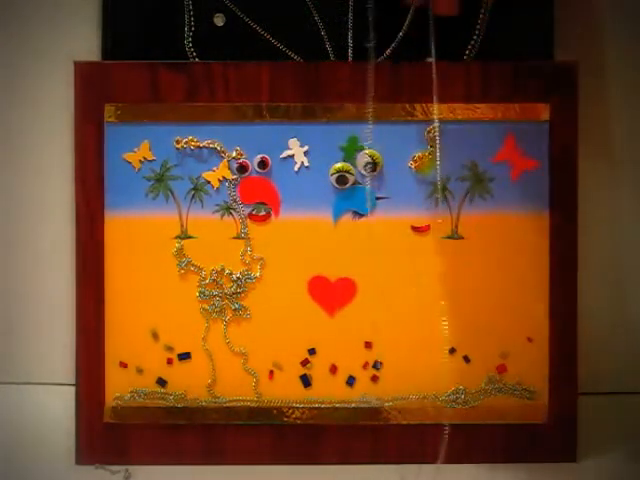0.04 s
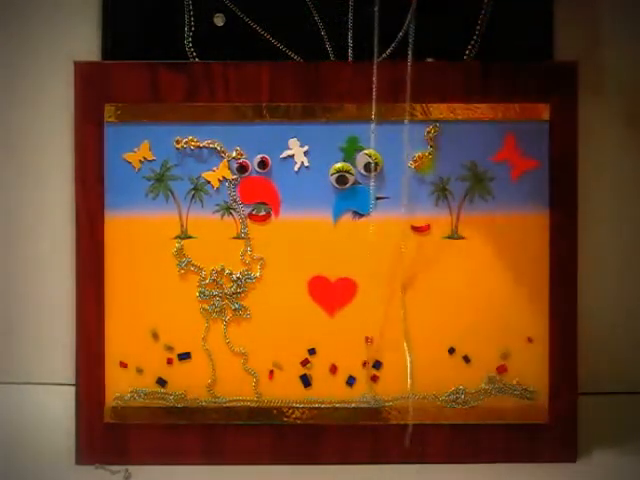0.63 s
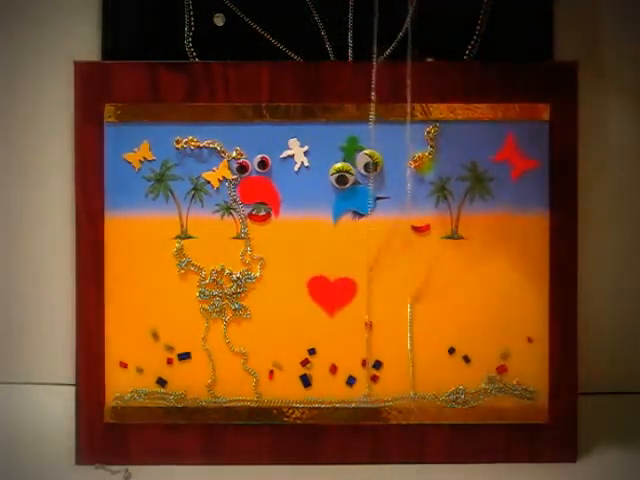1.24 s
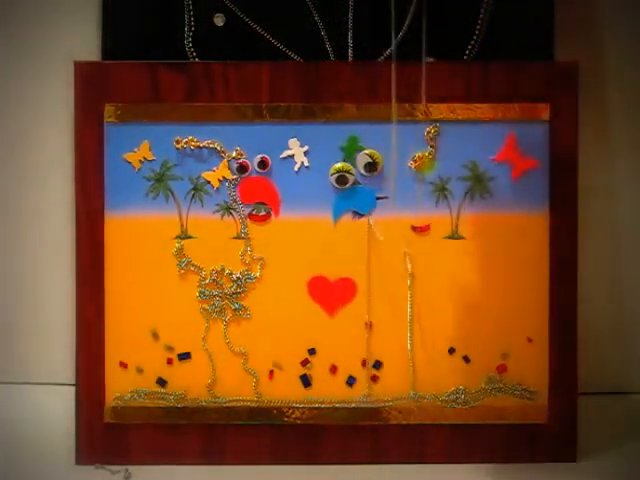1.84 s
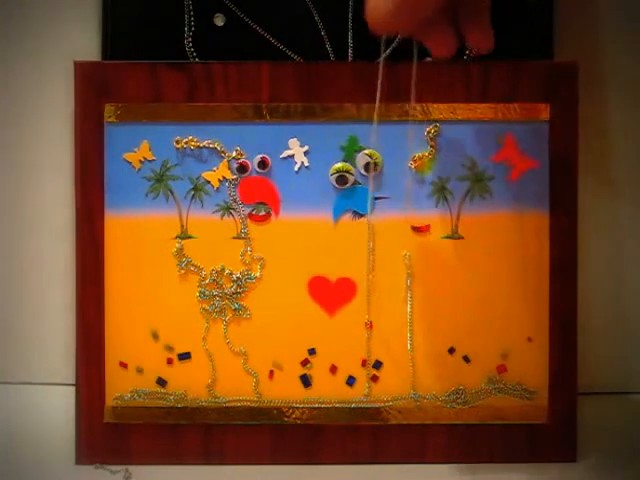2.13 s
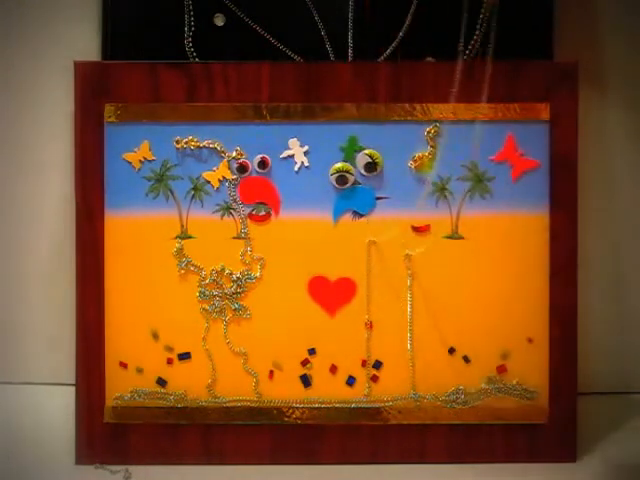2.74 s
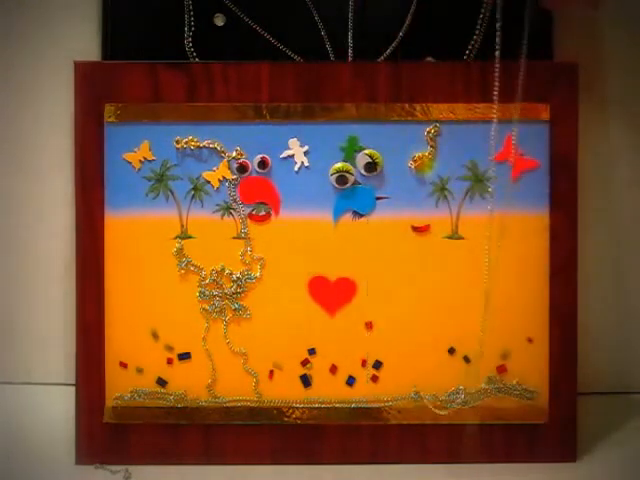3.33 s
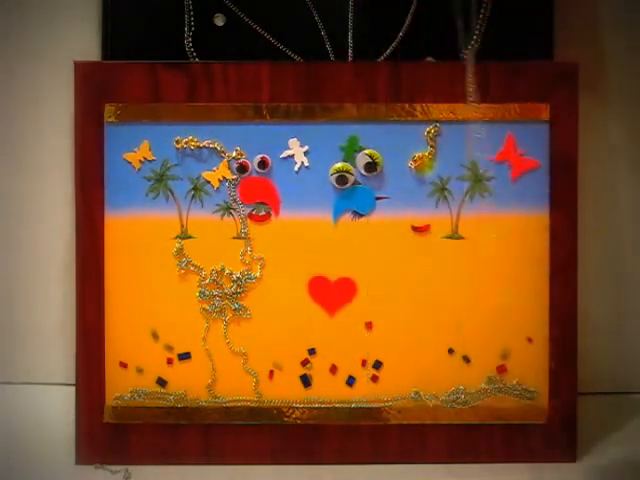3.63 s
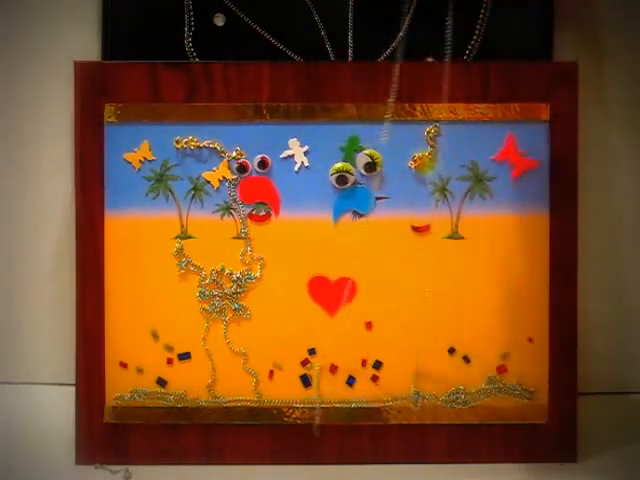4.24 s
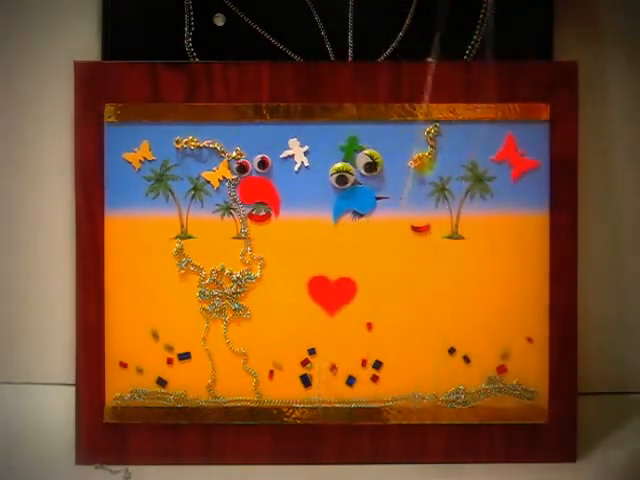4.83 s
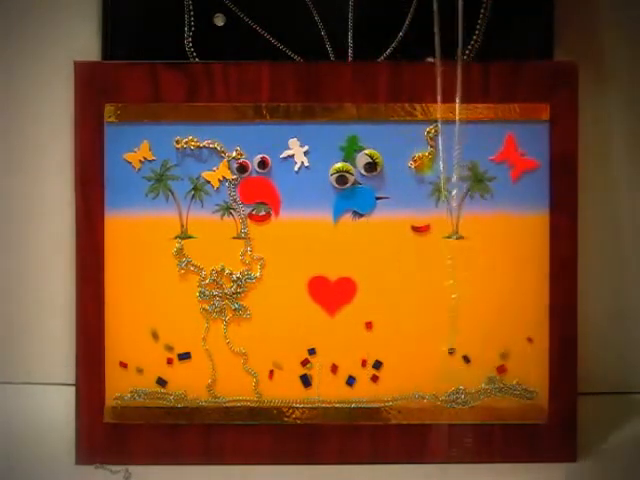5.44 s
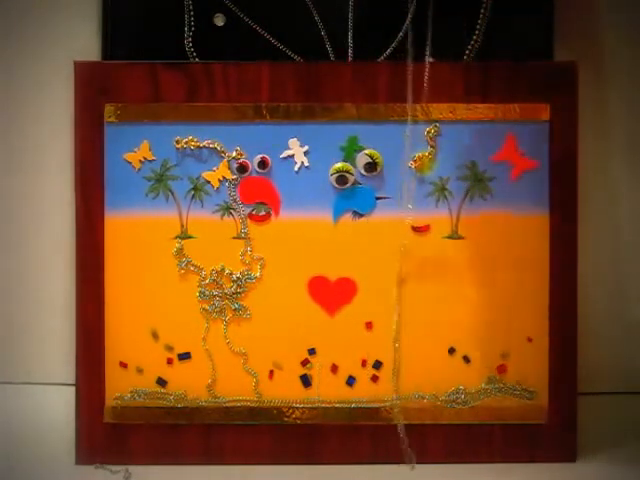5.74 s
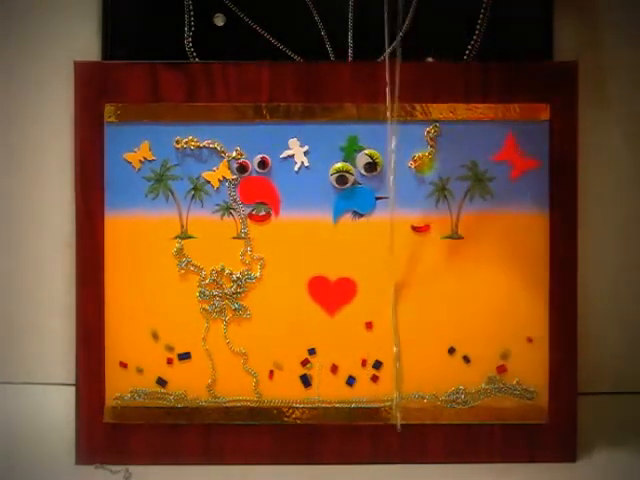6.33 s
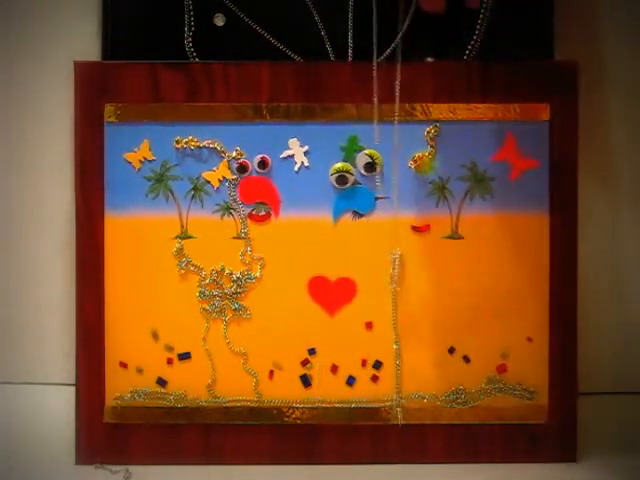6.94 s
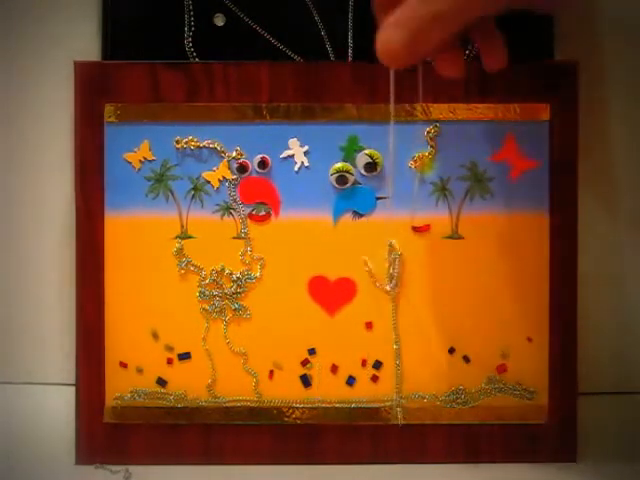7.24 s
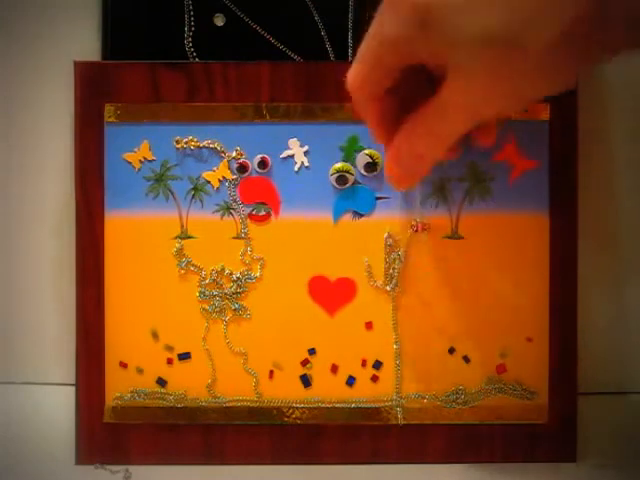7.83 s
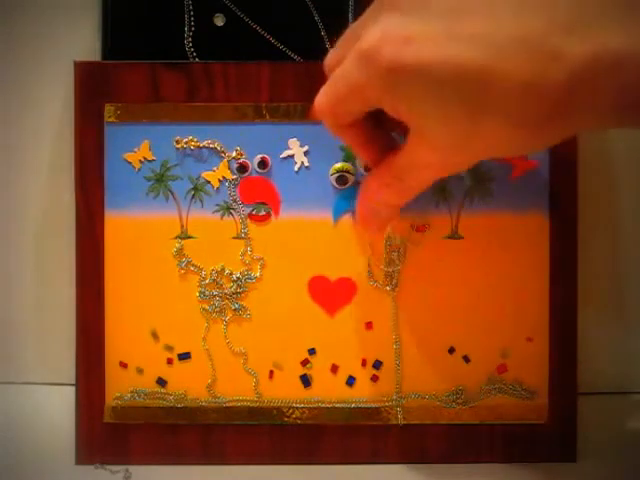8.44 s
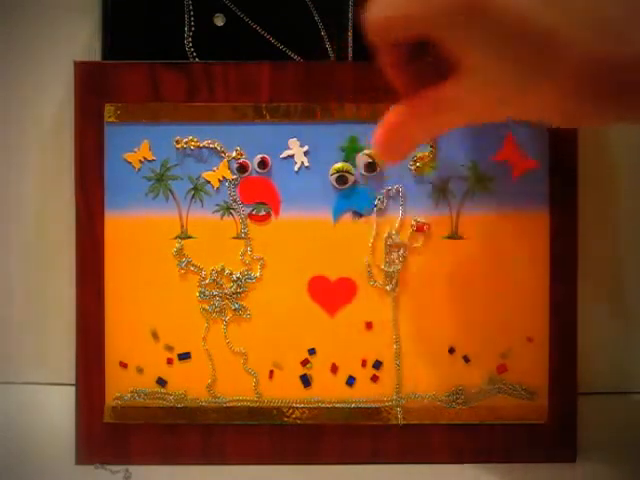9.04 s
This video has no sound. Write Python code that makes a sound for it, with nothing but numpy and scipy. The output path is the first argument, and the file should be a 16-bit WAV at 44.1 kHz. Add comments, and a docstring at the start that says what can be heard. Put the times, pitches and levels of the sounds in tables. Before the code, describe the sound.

Thin metal chains clink, tick and rattle lightly against an upright board in short irregular bursts, over a faint hiss.

```python
"""Thin metal chains dangle against an upright framed board, drag over its edge and are let down onto it.
Their ends knock on the board, sliding links rattle, slack loops clink as they pile up,
links tick over the edge of the frame and a clasp pings.
The booth is small and dead; a mono camera microphone adds hiss and a thin whine."""
import sys
import numpy as np
from scipy import signal
from scipy.fft import rfft, irfft, next_fast_len
from scipy.io import wavfile

SR = 44100
rng = np.random.default_rng(int(sys.argv[2]) if len(sys.argv) > 2 else 0)


def put_to_file(sound):
    """Save the sound as 16-bit audio at rate SR, in the file named by the first command-line argument."""
    columns = np.atleast_2d(sound).T  # one column per channel
    safe = np.clip(columns, -1, 1)
    whole_steps = np.round(safe * 32767)
    wavfile.write(sys.argv[1], SR, whole_steps.astype(np.int16))


N = 405279


def amp(db):
    """Decibels to gain."""
    return 10 ** (np.asarray(db) / 20)


def unit_rms(x):
    """Scale to an rms of one."""
    return x / np.sqrt(np.mean(x ** 2) + 1e-20)


def unit_energy(x):
    """Scale to an energy of one."""
    return x / np.sqrt(np.sum(x ** 2) + 1e-20)


def curve_at(points, hz):
    """Interpolate on a log-frequency axis."""
    points_hz, values = np.transpose(points)
    return np.interp(np.log(hz + 1), np.log(points_hz + 1), values)


def add(mix, start_s, sound):
    """Mix a sound in at start_s."""
    part = mix[round(start_s * SR):][:len(sound)]
    part += sound[:len(part)]


def click(colour, body_db=0, sparkle_db=0, patchy_db=0, dispersion=0.04985, size=1024):
    """Causal pulse of one contact; each link has a slightly different colour."""
    signed_hz = np.fft.fftfreq(size, 1 / SR)
    hz = abs(signed_hz)
    db = curve_at(colour, hz) + body_db * curve_at([(4500, 1), (7500, 0)], hz)
    db += sparkle_db * curve_at([(9000, 0), (12000, 1)], hz)
    db += patchy_db * np.interp(hz, np.linspace(0, SR / 2, 40), rng.standard_normal(40))
    minimum_phase = np.exp(np.conj(signal.hilbert(np.log(amp(db)))))
    # bending waves carry the treble out first: a tiny chirp
    bending = np.exp(-2j * np.pi * dispersion * np.sign(signed_hz) * np.sqrt(hz))
    return np.fft.ifft(bending * minimum_phase).real[:size // 2]


def run_of_links(length_s, gap_s, spread_db, chatter, chatter_s, rise_s):
    """Links land in quick turn and die away, longer clinks swelling first; each chatters as it settles."""
    starts_s = np.arange(0, max(length_s, gap_s / 2), gap_s)
    jitter, weight = rng.standard_normal((len(starts_s), 2)).T
    starts_s[1:] += gap_s * np.clip(jitter[1:] / 4, -.5, .5)
    swell = 1 - np.exp(-(starts_s + gap_s) / rise_s)
    fade = np.exp(-starts_s / max(length_s, gap_s))
    hits = np.zeros(round((starts_s[-1] + gap_s) * SR) + 256)
    np.add.at(hits, np.round(starts_s * SR).astype(int), swell * fade * amp(spread_db * weight))
    settling = signal.lfilter([1], [1, -np.exp(-1 / (chatter_s * SR))], hits)
    return unit_energy(hits) + chatter * unit_energy(settling * rng.standard_normal(len(hits)) ** 3)


def strike(run, pulse, level_db):
    """One pulse per contact; the total energy, spread over 10 ms, has level_db."""
    return amp(level_db) * np.sqrt(SR / 100) * unit_energy(np.convolve(run, pulse))


def ring(modes):
    """Decaying partials of a struck object, at unit energy."""
    t = np.arange(SR // 10) / SR
    partials = (amp(db) * np.sqrt(width_hz) * np.exp(-np.pi * width_hz * t) * np.cos(2 * np.pi * hz * t)
                for hz, width_hz, db in modes)
    return unit_energy(sum(partials))


# hiss spectrum: freq_hz, density_db
HISS_SPECTRUM = [(15, -16), (45, -5.5), (70, -6), (120, -4.5), (400, -2), (800, -3.5), (1500, -6.5),
                 (3700, -9.5), (6500, -11), (9000, -14.5), (11200, -11), (13200, -19.5), (14300, -6.5),
                 (15800, -16)]
# whine lines: pitch_hz, width_hz, rms_db
WHINE_LINES = [(6270, 120, -72), (7560, 2, -60), (7590, 8, -69), (7570, 200, -71), (7865, 60, -71),
               (15121, 8, -69), (15150, 4, -65.5)]


def hiss_and_whine(hiss_rms_db=-48.23):
    """Room air and microphone hiss, with narrow wavering lines of whine."""
    size = next_fast_len(N)
    hiss_gain = amp(curve_at(HISS_SPECTRUM, np.fft.rfftfreq(size, 1 / SR)))
    hiss = irfft(rfft(rng.standard_normal(size)) * hiss_gain, size)[:N]
    whine = np.zeros(N)
    for pitch_hz, width_hz, rms_db in WHINE_LINES:
        wander_rad = np.sqrt(2 * np.pi * width_hz / SR) * rng.standard_normal(N)
        phase_rad = np.cumsum(2 * np.pi * pitch_hz / SR + wander_rad)
        whine += amp(rms_db) * unit_rms(np.sin(phase_rad))
    return amp(hiss_rms_db) * unit_rms(hiss) + whine


# knock spectrum: freq_hz, density_db
KNOCK_SPECTRUM = [(150, -43), (500, -10), (850, -14.5), (1200, -6), (2050, -8.5), (2600, -5.5),
                  (3700, -1.5), (6000, -1), (8500, -0.5), (10500, -5), (13000, -13.5), (15500, -20)]
# landing place, high near the board's middle: time_s, low_mode_bias_db
LANDING_BIAS = [(.5, -7), (2.28, 1), (4.05, -2), (5.75, 0), (8.11, 3.5), (8.37, 2)]
# share of that bias across the spectrum: freq_hz, share
BIAS_SHARE = [(600, 0), (1150, .7), (1700, -.5), (2100, -.2), (2600, -1), (3500, 0)]
# chain ends hitting the board: start_s, level_db, length_s, body_db
END_KNOCKS = [(0.3274, -38.5, .003, -3), (0.488, -26, .001, 8), (0.491, -22.5, .011, 1),
              (0.6102, -27.5, .001, 2), (0.666, -39, .002, -4), (2.2274, -44.5, .003, 12),
              (2.2757, -38, .005, 11), (2.506, -44.5, .002, 3), (4.0144, -28.5, .002, 6),
              (4.0242, -22, .001, -3.5), (4.0283, -30.5, .002, -3), (4.0414, -31, .004, -6),
              (4.14, -35, .004, -2), (4.1536, -31, .002, -3.5), (5.677, -37, .004, 1.5),
              (5.7302, -20, .001, -2), (5.739, -20.5, 0.015, -0.5), (5.76, -26.5, .005, -2),
              (5.7722, -22.5, .007, 2), (5.7924, -31.5, .003, 1), (8.1057, -36.5, .009, 8),
              (8.37, -38, .004, 4.5)]


def knocks(gain_db=-3.5):
    """A chain end hits the board and links whip on after it; the place sets which mode answers."""
    out = np.zeros(N)
    hz = np.geomspace(100, SR / 2, 120)
    for start_s, level_db, length_s, body_db in END_KNOCKS:
        bias_db = np.interp(start_s, *np.transpose(LANDING_BIAS))
        colour_db = curve_at(KNOCK_SPECTRUM, hz) + bias_db * curve_at(BIAS_SHARE, hz)
        run = run_of_links(length_s, gap_s=.0017, spread_db=3.5,
                           chatter=.8, chatter_s=.00046, rise_s=.00053)
        pulse = click(np.column_stack([hz, colour_db]), body_db, sparkle_db=.3, patchy_db=.5)
        add(out, start_s, strike(run, pulse, level_db))
    return amp(gain_db) * out


# modes of the board and its fittings: pitch_hz, width_hz, level_db
BOARD_MODES = [(1173, 120, 3.5), (1640, 100, -11), (2566, 70, 7.5), (2720, 65, 1), (3930, 50, -9),
               (4860, 44, -8), (5580, 74, 0), (6320, 69, 3), (7130, 80, -17), (8140, 54, -4),
               (8720, 39, -3), (9630, 42, -20), (10200, 30, -18)]


def board_and_booth(x, ring_db, near_db, near_t60_s, far_db, far_t60_s=.16, echoes_per_s=6000):
    """The board rings briefly; close walls add a quick dense echo, the room a faint longer one."""
    t = np.arange(SR // 10) / SR
    out = x + amp(ring_db) * signal.oaconvolve(x, ring(BOARD_MODES))[:N]
    # four echo patterns crossfade as the contact point moves
    turn_rad = 2 * np.pi * 5.3 * np.arange(N) / SR
    for share in np.cos(turn_rad), np.sin(turn_rad), np.cos(np.e * turn_rad), np.sin(np.e * turn_rad):
        near, far = rng.choice([-1., 1.], (2, len(t))) * (rng.random((2, len(t))) < echoes_per_s / SR)
        near = near * amp(-60 * t / near_t60_s) * (t > .0004)
        far = far * amp(-60 * t / far_t60_s) * (t > .004)
        far = signal.lfilter(*signal.butter(1, 9000, fs=SR), far)
        echoes = amp(near_db) * unit_energy(near) + amp(far_db) * unit_energy(far)
        out += signal.oaconvolve(x * share / np.sqrt(2), echoes)[:N]
    return out


# rattle spectrum: freq_hz, density_db
SLIDE_SPECTRUM = [(400, -25), (1900, -11), (2600, -4.5), (3800, 0), (5800, 1), (8500, -4.5), (11000, -8),
                  (15500, -7.5)]
# sliding strokes: start_s, fastest_s, end_s, level_db
SLIDE_STROKES = [(.62, .71, 0.83, -55.5), (.8, 1.26, 1.38, -50.5), (2.12, 2.23, 2.39, -51),
                 (2.42, 2.47, 2.7, -54.5), (3.15, 3.272, 3.39, -45), (4.22, 4.39, 4.5, -52.5),
                 (4.567, 4.703, 4.8, -57), (6.055, 6.196, 6.46, -47.5), (8.648, 8.727, 9.2, -55.5)]


def sliding(contacts_per_s=600, spread_db=3, streams=10):
    """Tiny link contacts rattle as the chain speeds up and slows down over the board."""
    t = np.arange(N) / SR
    envelope = sum(amp(level_db) * np.sqrt(np.interp(t, [start_s, fastest_s, end_s], [0, 1, 0]))
                   for start_s, fastest_s, end_s, level_db in SLIDE_STROKES)
    rattle = np.zeros(N)
    for _ in range(streams):
        contacts = rng.random(N) < contacts_per_s / streams / SR
        force = amp(spread_db * np.minimum(rng.exponential(1, N), 3))
        rattle += signal.oaconvolve(contacts * force, click(SLIDE_SPECTRUM, patchy_db=2.5))[:N]
    return envelope * unit_rms(rattle)


def tumble(start_s, length_s, first_db, bright_db, gap_s=.0105, run_s=.004, fade_db=-4.5, spread_db=2.5):
    """Slack chain falls unevenly, ever more lightly: one clink row per loop."""
    after_s = np.arange(0, length_s, gap_s)
    jitter, weight = rng.standard_normal((len(after_s), 2)).T
    times_s = start_s + after_s + gap_s * np.clip(jitter / 4, -.5, .5) * (after_s > 0)
    levels_db = first_db + fade_db * after_s / length_s + spread_db * weight
    return [(time_s, level_db, run_s, bright_db) for time_s, level_db in zip(times_s, levels_db)]


# clink spectrum: freq_hz, density_db
CLINK_SPECTRUM = [(300, -40), (1100, -9.5), (1900, -11), (2700, -6), (4000, -0.5), (5500, -3.5), (8000, -3),
                  (10000, -3.5), (13000, -7), (15500, -11.5)]
# slack chain tumbling: start_s, length_s, first_db, bright_db
SLACK_TUMBLES = [(0.679, 0.053, -44, -3), (1.078, 0.019, -42.5, 2), (1.409, 0.067, -39.5, 8),
                 (3.362, .018, -41.5, -2), (3.472, .016, -40.5, -1), (4.077, 0.052, -39.5, 2.5),
                 (4.985, .025, -44, -2), (5.834, .075, -36, -0.5), (6.561, .02, -40.5, 4),
                 (7.58, 0.023, -36, 0.5), (7.839, 0.039, -48, 0), (9.021, .03, -41, -5)]
# single loops dropping on the heap: start_s, level_db, length_s, bright_db
LOOP_DROPS = [(0.9034, -45, .006, -2), (1.116, -37.5, .006, 11), (1.3819, -35.5, .002, -2),
              (1.4517, -39.5, .002, 1), (3.3536, -37, .001, -2), (3.4406, -34.5, 0.0092, 0),
              (3.4521, -33.5, 0.0066, -5), (3.4933, -36.5, .002, 0), (4.9717, -42, .002, -3),
              (5.8218, -34.5, .005, 0), (6.5841, -36, 0.017, 4.5), (6.6504, -40, .006, 3),
              (7.0997, -37.5, .006, -5), (7.1712, -34.5, .011, -4), (7.181, -28.5, .015, 5),
              (7.2279, -28, 0.0025, 9.5), (7.5626, -32, .01, -7), (7.6242, -37.5, .002, -2),
              (8.129, -41.5, .005, -7), (8.7272, -44, .001, 0), (8.9771, -31.5, .003, 2),
              (9.0519, -32, 0.0096, 0.5), (9.073, -39.5, .003, -4)]


def clinks(gain_db=-2, body_loss=.32):
    """Slack links land on each other in short runs; brighter clinks have less body."""
    out = np.zeros(N)
    tumbling = [loop for row in SLACK_TUMBLES for loop in tumble(*row)]
    for start_s, level_db, length_s, bright_db in list(LOOP_DROPS) + tumbling:
        run = run_of_links(length_s, gap_s=.0012, spread_db=4,
                           chatter=.91, chatter_s=.00096, rise_s=.0019)
        pulse = click(CLINK_SPECTRUM, -body_loss * bright_db, sparkle_db=bright_db, patchy_db=2.5)
        add(out, start_s, strike(run, pulse, level_db))
    return amp(gain_db) * out


def pull(first_s, last_s, link_s, speedup, mid_db, body_db, speed_db=17, jitter_s=.0006, spread_db=1.1):
    """Links cross the edge, closer and louder as the hand speeds up: one tick row per link."""
    along = np.linspace(0, 1, round((last_s - first_s) / link_s) + 1)
    jitter, weight = rng.standard_normal((len(along), 2)).T
    elapsed = along + speedup * along * (1 - along) / 2
    times_s = first_s + (last_s - first_s) * elapsed + jitter_s * jitter
    levels_db = mid_db + speed_db * speedup * (along - .5) + spread_db * weight
    return [(time_s, level_db, body_db) for time_s, level_db in zip(times_s, levels_db)]


# tick spectrum: freq_hz, density_db
TICK_SPECTRUM = [(400, -34), (1900, -19), (2600, -15.5), (3400, -14.5), (6000, -13), (7800, -1),
                 (9000, -0.5), (10200, -7), (12000, -18), (15500, -21)]
# links catching and snapping free: start_s, level_db, body_db
LINK_SNAGS = [(0.9758, -41, 10), (1.0374, -43, 6), (4.3741, -33, 1), (4.8198, -30.5, 2.5)]
# steady pulls over the frame's edge: first_s, last_s, link_s, speedup_share, mid_db, body_db
EDGE_PULLS = [(1.195, 1.314, .03, -0.068, -43, 8.5), (4.2538, 4.278, .026, 0, -46, 11),
              (4.318, 4.4539, .027, 0.11, -38.5, 3.5), (4.5976, 4.76, .023, 0.26, -38, 5.5),
              (6.143, 6.247, .026, -.1, -43, 9.5), (6.284, 6.491, .034, -.15, -45, 8)]


def ticks(gain_db=-5, bounce_s=.0022, bounce_db=-3.5):
    """A link snaps over the edge and bounces once: a high ping, fuller if the frame shares the blow."""
    out = np.zeros(N)
    pulled = [link for row in EDGE_PULLS for link in pull(*row)]
    for start_s, level_db, body_db in list(LINK_SNAGS) + pulled:
        add(out, start_s, strike([1], click(TICK_SPECTRUM, body_db, patchy_db=3), level_db))
        delay_s = bounce_s * rng.uniform(.5, 2)
        bounce = click(TICK_SPECTRUM, body_db, patchy_db=3.5)
        add(out, start_s + delay_s, strike([1], bounce, level_db + bounce_db))
    return amp(gain_db) * out


# clasp modes: pitch_hz, width_hz, level_db
CLASP_MODES = [(3620, 55, 3), (4700, 51, -4), (8750, 100, -15)]
# clasp landings: start_s, level_db
CLASP_LANDINGS = [(2.2758, -41.5), (7.565, -33), (8.3705, -46.5), (8.9773, -39)]


def clasp():
    """A clasp gives a short pitched ping as it lands."""
    out = np.zeros(N)
    for start_s, level_db in CLASP_LANDINGS:
        add(out, start_s, strike([1], ring(CLASP_MODES), level_db))
    return out


def scene():
    """Chains in the booth at one microphone, the same on both channels."""
    mono = board_and_booth(knocks(), ring_db=-9, near_db=-1, near_t60_s=.043, far_db=-7)
    mono += board_and_booth(clinks() + sliding(), ring_db=-15.5, near_db=-6, near_t60_s=.048, far_db=-6.5)
    mono += board_and_booth(ticks(), ring_db=-10, near_db=-7, near_t60_s=.044, far_db=-11.5)
    return np.tile(mono + clasp() + hiss_and_whine(), (2, 1))


def record(dry):
    """The microphone stage rounds the sharpest peaks; the camera limits the band."""
    ceiling, cutoff_hz = .7, 15750
    rounded = ceiling * np.tanh(dry / ceiling)
    lowpass = signal.firwin(501, cutoff_hz, window=("kaiser", 8), fs=SR)
    return signal.oaconvolve(rounded, lowpass[None], "same")


dry = scene()
out = record(dry)
put_to_file(out)
```